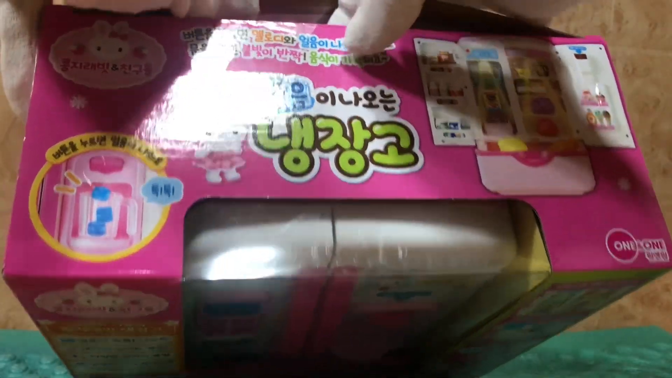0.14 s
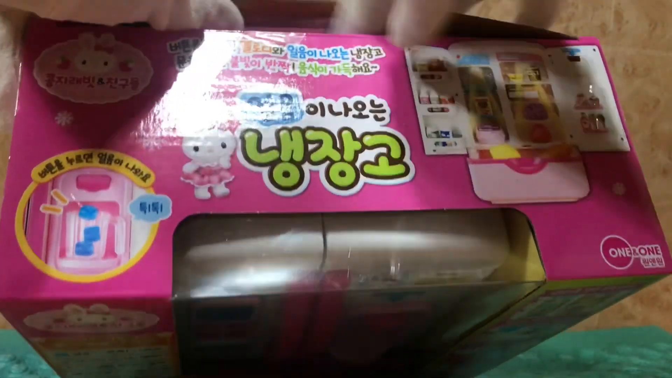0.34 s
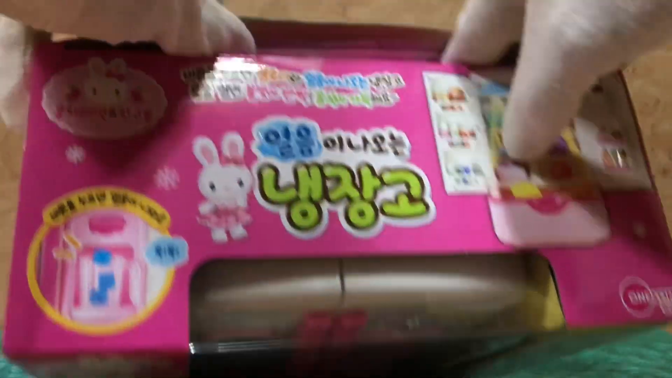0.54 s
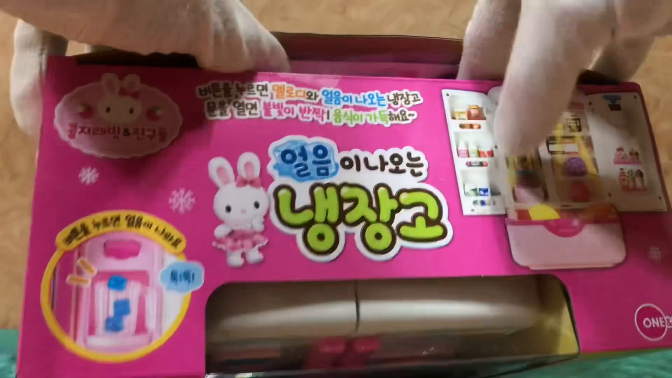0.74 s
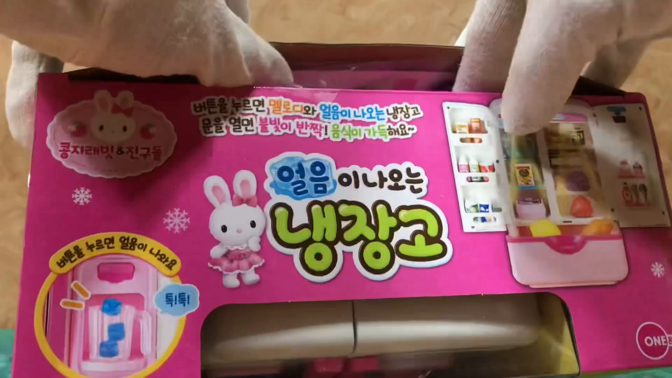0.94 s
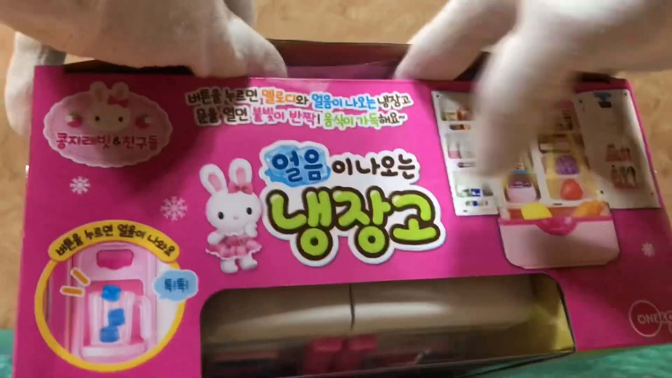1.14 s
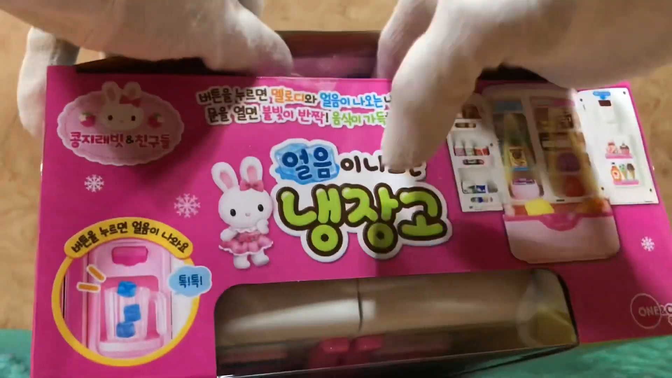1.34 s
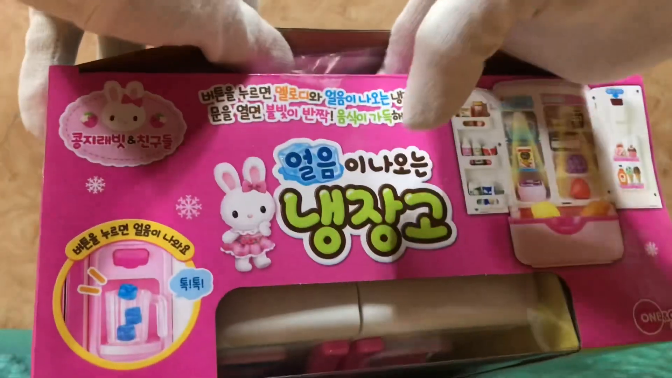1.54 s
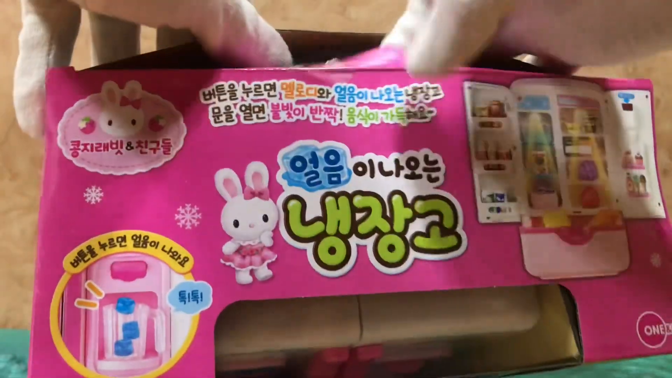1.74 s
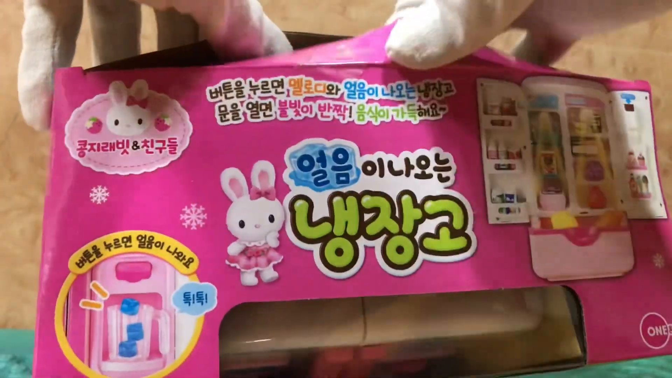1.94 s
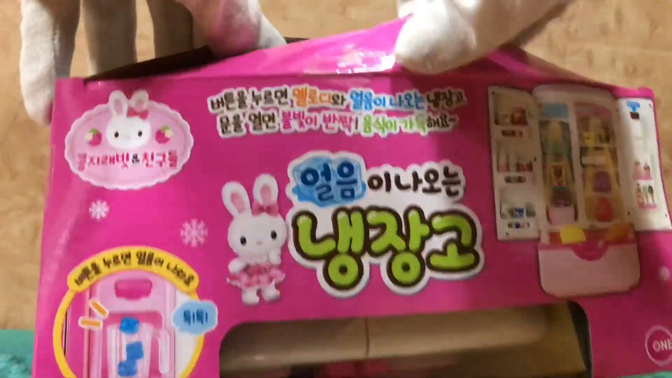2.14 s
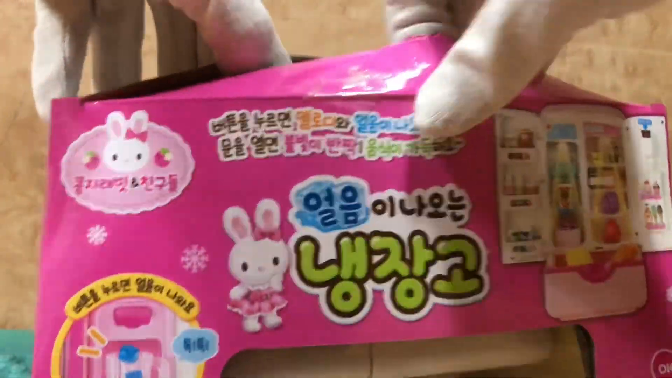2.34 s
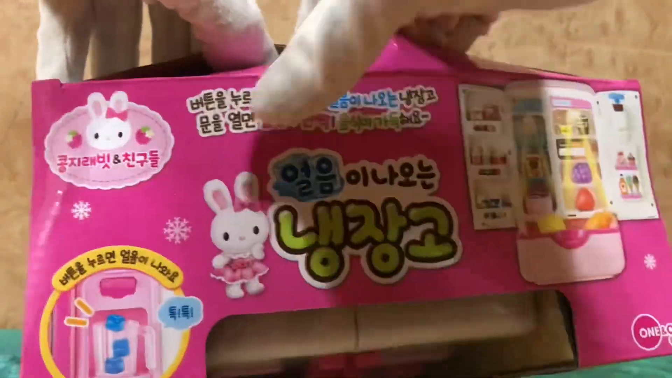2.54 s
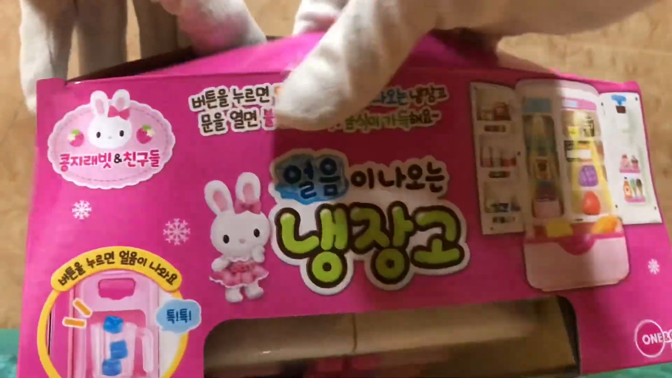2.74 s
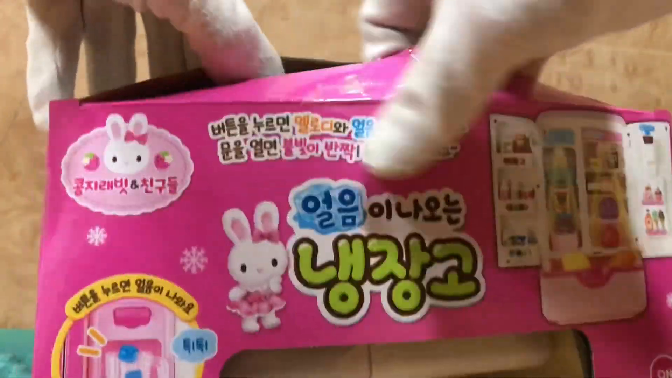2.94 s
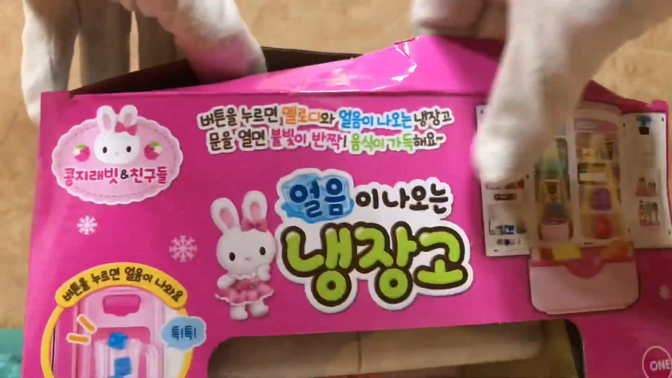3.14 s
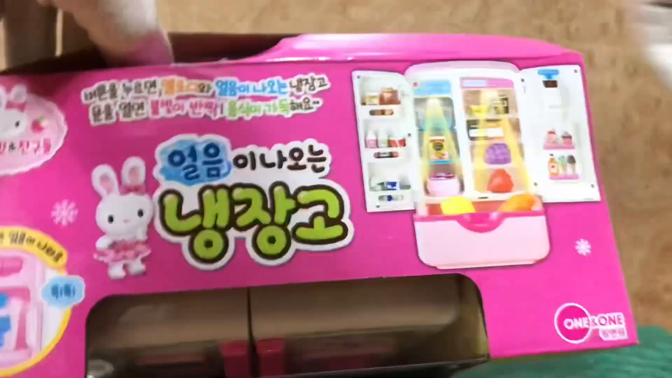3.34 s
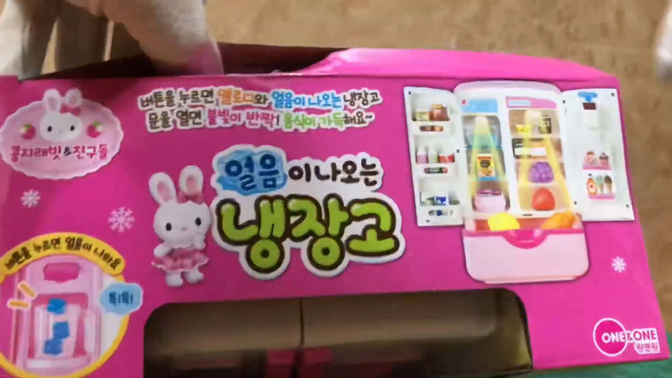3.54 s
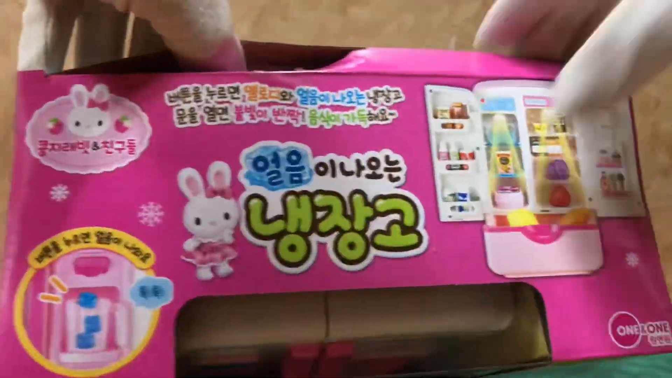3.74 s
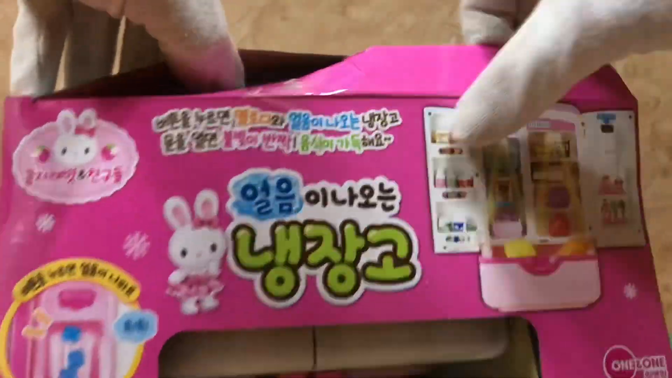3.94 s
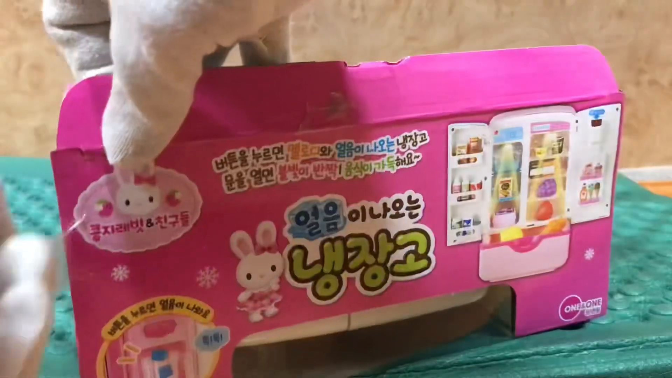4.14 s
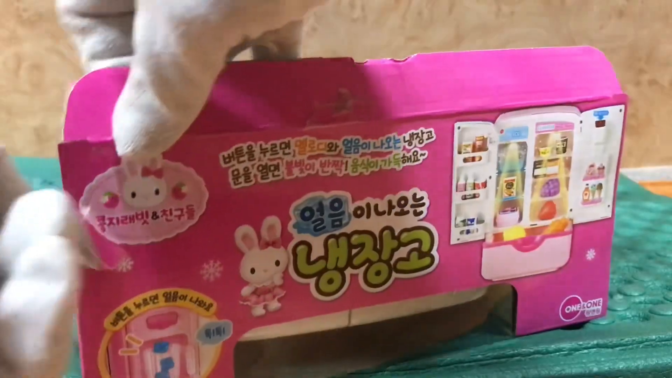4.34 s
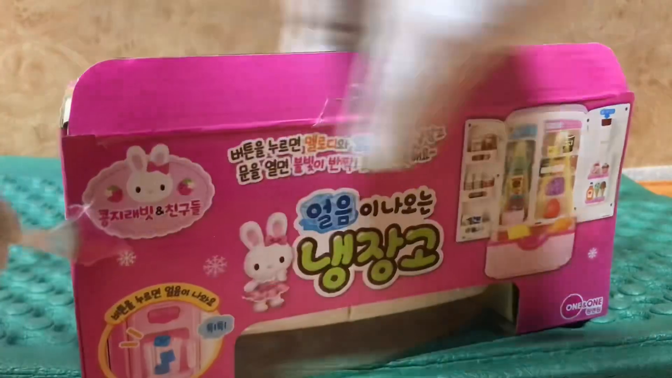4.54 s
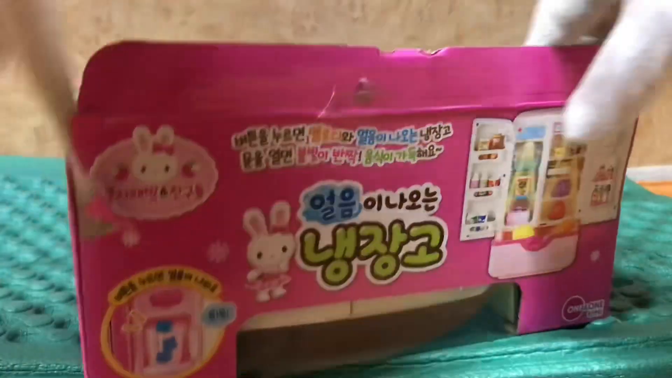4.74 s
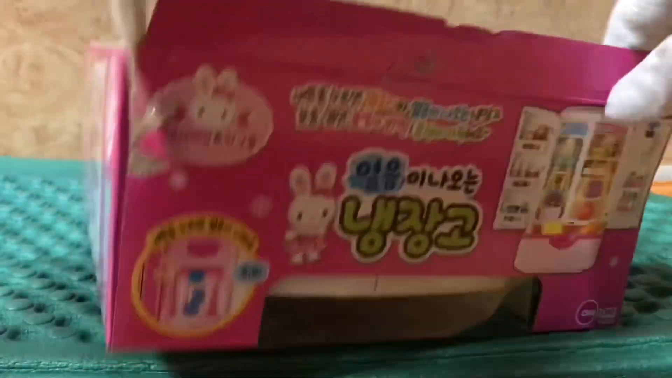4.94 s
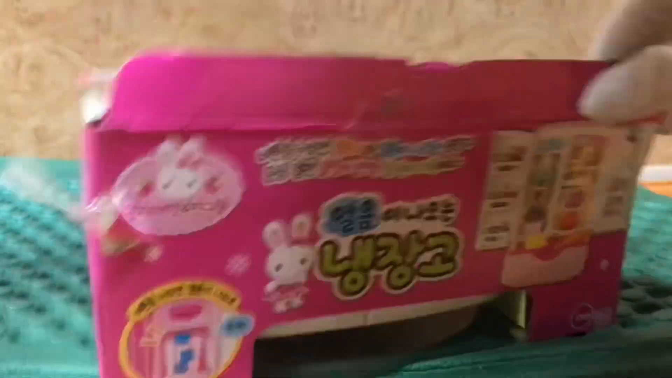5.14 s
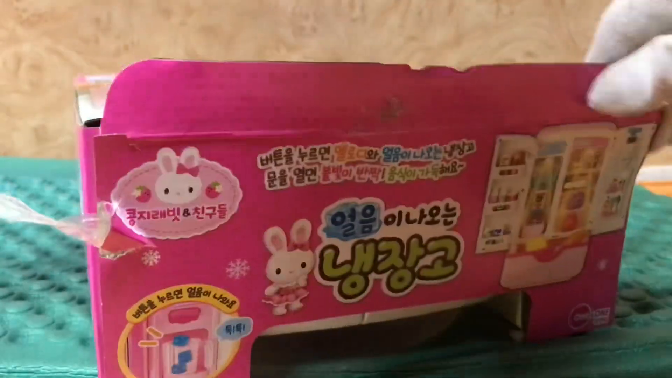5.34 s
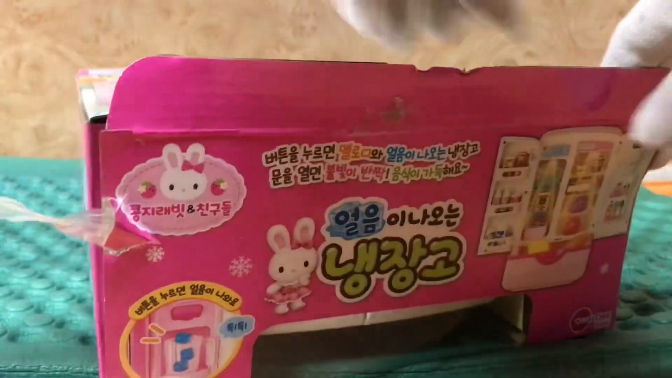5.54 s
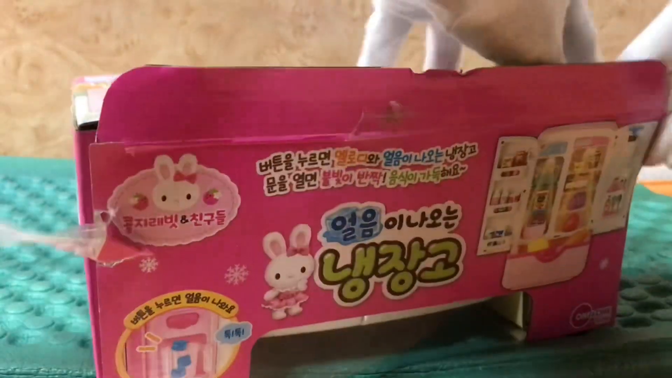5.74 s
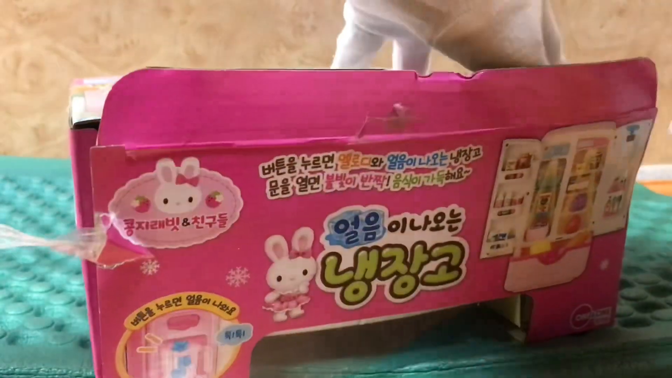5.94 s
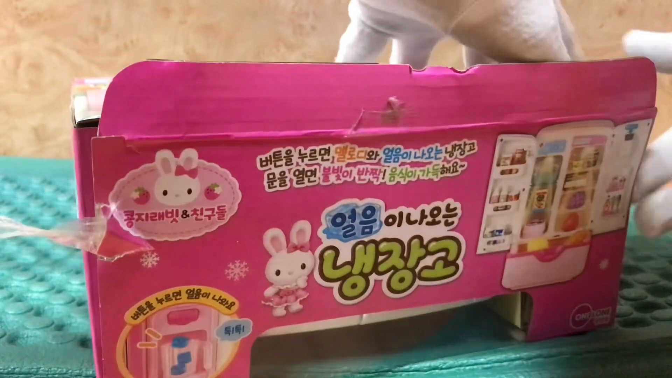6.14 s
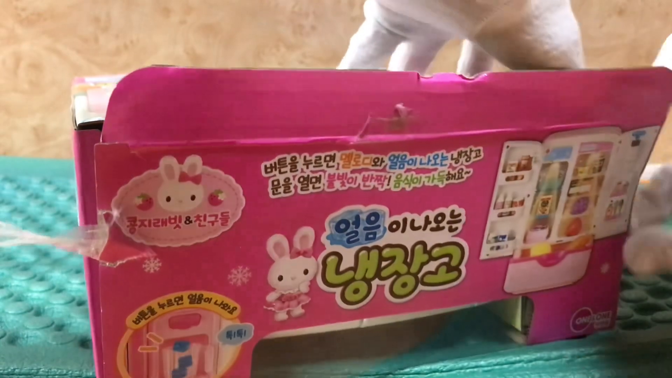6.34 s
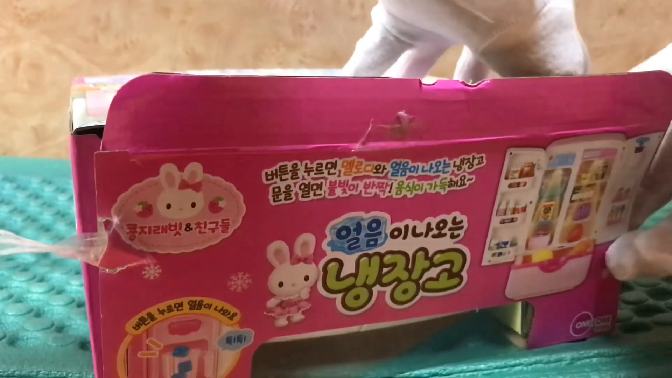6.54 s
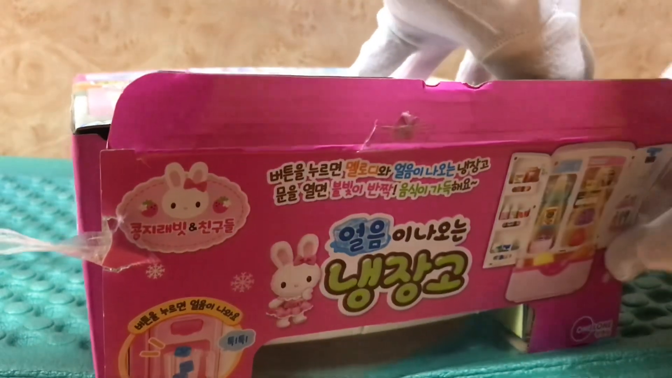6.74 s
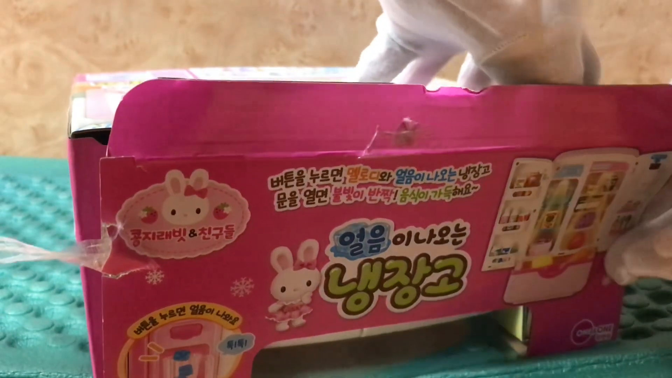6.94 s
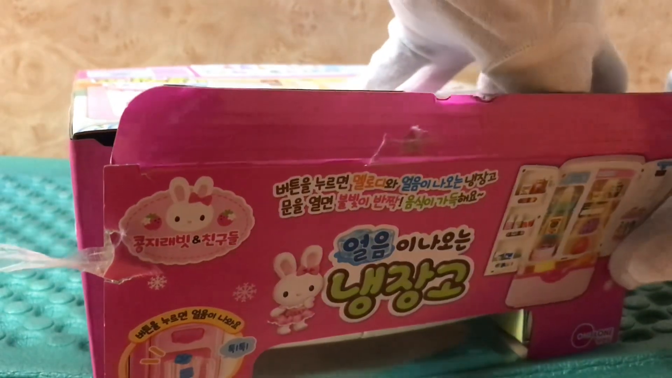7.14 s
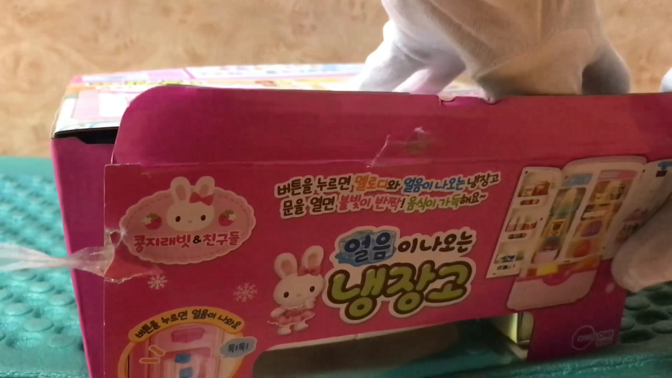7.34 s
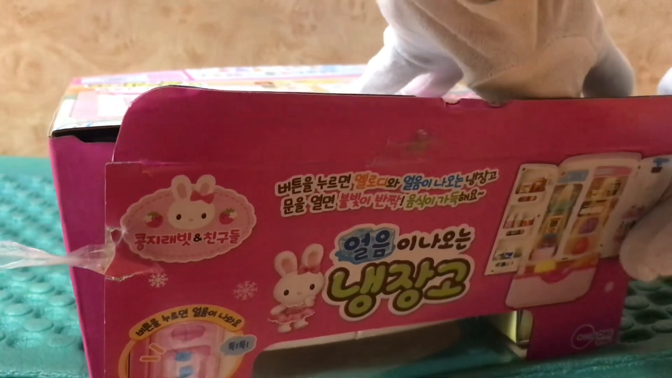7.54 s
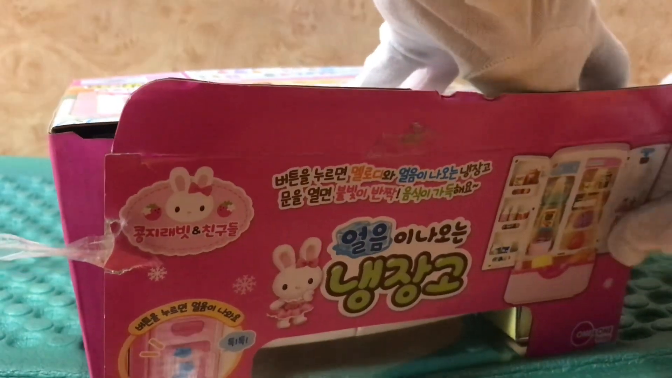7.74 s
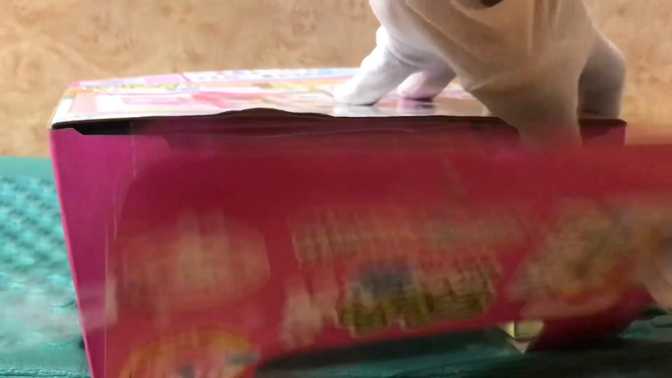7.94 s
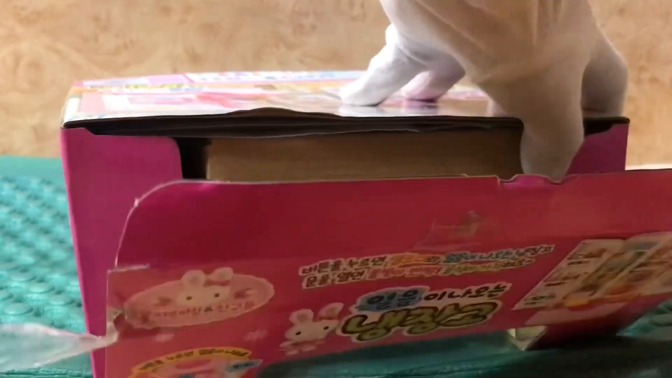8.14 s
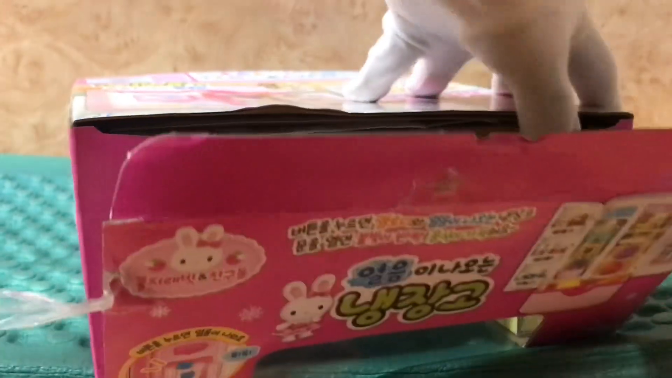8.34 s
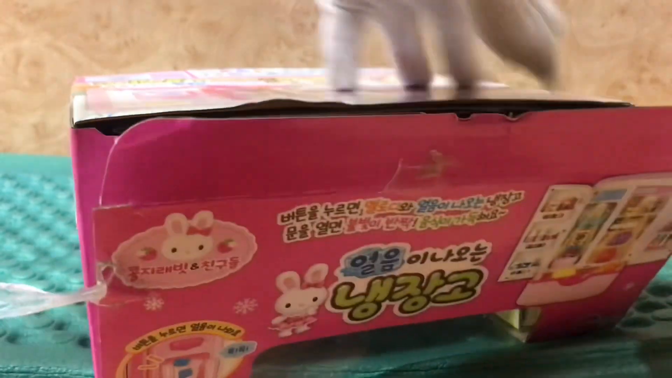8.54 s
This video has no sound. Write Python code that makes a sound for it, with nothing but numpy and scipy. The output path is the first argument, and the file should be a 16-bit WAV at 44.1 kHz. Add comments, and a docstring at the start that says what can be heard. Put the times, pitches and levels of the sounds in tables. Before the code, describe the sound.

Quiet indoor room tone with faint hiss; a cardboard box is handled very close. From 0 to 1.2 s there are only a light snap, faint scrapes and small ticks. Around 1.25-1.6 s dry card clicks and grainy rubs gather into a firm hollow knock at 1.63 s. Creaks and scrapes continue, with a papery snap at 2.24 s and smaller ones to 2.9 s. Two loud, boxy pops land at 3.18 and 3.29 s, then it calms. A tiny near-mute gap at 4.06 s leads straight into bright, rapid tape tearing at 4.15-4.25 s. Softer shuffles follow, with a crack and brief faint glove squeaks near 5.0-5.1 s, and sparse taps and rubs, one crisp tick at 6.36 s. At 7.67-7.92 s sharp, glossy flap cracks and a thump burst out; little clicks at 8.3-8.4 s fade into room tone.

```python
"""A light snap and a faint scrape over quiet room tone: gloved hands pry open a glossy card box close by.
Flaps, creases and tape snap as torn bursts ringing the card; the hollow box thumps as sagging sines.
Fingers and flaps slide in grainy scrapes made of random slips through card modes, with hiss and rumble,
and a fingertip squeaks briefly. A short room tail answers; an edit cut leaves one nearly mute gap."""
import sys
import numpy as np
from scipy import signal
from scipy.io import wavfile
from scipy.ndimage import uniform_filter1d

SR = 44100
rng = np.random.default_rng(int(sys.argv[2]) if len(sys.argv) > 2 else 0)


def level_to_linear(level):
    """Convert decibel levels to linear amplitude factors, elementwise."""
    exponent = np.asarray(level, float) / 20
    return 10 ** exponent


def put_to_file(sound):
    """Save the sound as 16-bit audio at rate SR, in the file named by the first command-line argument."""
    columns = np.atleast_2d(sound).T  # one column per channel
    safe = np.clip(columns, -1, 1)
    whole_steps = np.round(safe * 32767)
    wavfile.write(sys.argv[1], SR, whole_steps.astype(np.int16))


N = 378819

# modes of the card panel, base widths and relative levels: (pitch_hz, width_hz, level_db)
CARD_MODES = [(435, 41, -12.5), (731, 26, -15.5), (1090, 420, 6), (1600, 780, 11), (2255, 870, -5.5),
              (2730, 930, -15), (3400, 660, -16), (4300, 1800, -12.5), (1110, 152, -18), (1590, 92, -19),
              (2272, 74, -24), (4280, 320, -23), (6200, 1800, -12.5)]
# treble spectrum of cracks and fine slips, relative: (frequency_hz, level_db per Hz)
HISS_SPECTRUM = [(1470, -40), (2500, -7), (2930, -8.5), (3350, -1.5), (5050, -3.5), (5770, 0.5),
                 (7150, -3.5), (8840, -2.5), (10500, -6.5), (13000, -2.5), (15400, -3), (16500, -17.5)]
# the hollow box pushed or set down: (start_s, peak_db, pitch_hz, t60_s)
BOX_PUSHES = [(0.276, -44, 64, .1), (0.48, -42, 68.4, 0.095), (1.241, -41.5, 113, 0.07),
              (1.434, -35.5, 324, 0.043), (1.632, -13.5, 124, 0.077), (2.247, -37.5, 65, 0.29),
              (2.252, -31.5, 208, 0.054), (2.313, -33.5, 237, 0.088), (2.409, -34.5, 151, 0.38),
              (2.488, -31, 148, 0.14), (2.602, -29, 198, 0.092), (2.696, -26, 227, 0.076),
              (2.886, -37, 190, 0.13), (3.186, -14, 114, 0.044), (3.295, -13.5, 98.7, 0.062),
              (3.931, -39.5, 76.6, 0.2), (4.16, -28, 236.4, 0.17), (4.177, -29, 297, 0.083),
              (4.194, -23.5, 364, 0.051), (4.216, -25.5, 322, 0.053), (4.23, -20, 374, 0.031),
              (4.537, -37, 102, 0.068), (4.79, -47.5, 61.7, 0.26), (4.831, -46, 58, 0.63),
              (5.005, -26.5, 213, 0.029), (5.017, -22.5, 201, 0.039), (5.043, -33, 149, 0.12),
              (5.149, -27.5, 197, 0.023), (5.171, -37, 56.7, .15), (5.599, -20, 140, 0.089),
              (5.938, -53, 252, 0.085), (6.064, -45, 87.3, 0.082), (6.36, -36, 203.4, 0.043),
              (6.531, -29.5, 116.5, 0.03), (6.743, -32, 198, 0.032), (7.173, -42.5, 195, 0.055),
              (7.296, -43.5, 96.3, 0.16), (7.666, -28, 238, 0.037), (7.761, -24, 243, 0.12),
              (7.835, -16, 118, 0.05), (7.914, -30, 212, 0.11), (8.048, -42.5, 74.6, 0.12),
              (8.24, -40.5, 82, 0.25), (8.339, -43, 84, 0.05)]
# an edit cut, nearly mute for 16 ms: (start_s, end_s, level_db)
EDIT_CUT = (4.058, 4.074, -23)


def evened(x):
    """Scales to rms 1."""
    return x / np.sqrt(np.mean(x ** 2) + 1e-20)


def read(points, hz):
    """Reads a table of values against frequency on a log axis."""
    f, value = np.transpose(points)
    return np.interp(np.log(hz + 1), np.log(f + 1), value)


def add(mix, start_s, sound):
    """Mixes a sound in at start_s seconds."""
    part = mix[max(round(start_s * SR), 0):][:len(sound)]
    part += sound[:len(part)]


def colour(points, size=4096):
    """Causal (minimum-phase) impulse response with the given spectrum, floored at -80 dB."""
    level_db = read(points, abs(np.fft.fftfreq(size, 1 / SR)))
    log_gain = np.log(level_to_linear(np.maximum(level_db, -80)))
    response = np.fft.ifft(np.exp(np.conj(signal.hilbert(log_gain)))).real
    return response[:size // 2]


def ring(hz, width_hz, size=1500):
    """One dying mode: the wider its resonance, the faster it fades."""
    t = np.arange(size) / SR
    return np.exp(-np.pi * width_hz * t) * np.sin(2 * np.pi * hz * t)


def grains(per_s, spread_db, smooth):
    """Stick-slip: random slips of uneven size over a smooth rub."""
    size = level_to_linear(spread_db * np.minimum(rng.exponential(1, N), 4))
    slipping = rng.random(N) < per_s / SR
    return evened(size * slipping * rng.standard_normal(N)) + smooth * rng.standard_normal(N)


def strokes(t):
    """Sums the strokes by power: scrape dB, hiss dB and favoured pitch; glossier, stiffer card favours higher modes."""
    # fingers and flaps over the card; gloss_db sets hiss relative to scrape:
    # (hardest_s, swell_s, release_s, scrape_db, gloss_db)
    stroke_list = [(.0, 0.023, 0.35, -61, -10), (.367, 0.28, 0.23, -60, 0), (0.838, 0.25, 0.056, -53.5, -8),
                   (1.043, 0.035, 0.069, -51, -6), (1.252, 0.25, 0.12, -67.5, 7.5),
                   (1.34, 0.19, 0.1, -53, -17), (1.471, 0.019, 0.14, -40, -10),
                   (1.517, 0.1, 0.022, -37, -15), (1.633, 0.033, 0.044, -34.5, -14.5),
                   (1.759, 0.14, 0.058, -47, -9.5), (2.02, 0.37, 0.12, -51, -9),
                   (2.118, 0.023, 0.025, -51.5, -12), (2.238, 0.046, 0.041, -35, -9),
                   (2.318, 0.028, .045, -45, -7.5), (2.41, 0.037, 0.08, -34.5, -11.5),
                   (2.501, 0.043, 0.026, -40, -10), (2.589, 0.14, 0.055, -49, -10.5),
                   (2.696, 0.062, 0.058, -40, -8.5), (2.848, 0.015, 0.077, -43, -17),
                   (2.89, 0.052, 0.16, -40, -4), (3.14, 0.4, 0.05, -44, -4),
                   (3.194, 0.039, 0.14, -32.5, -6), (3.301, 0.066, 0.1, -34, -29),
                   (3.705, 0.057, 0.17, -48, -3.5), (4.057, 0.14, 0.016, -41, -2.5),
                   (4.11, 0.38, 0.27, -48.5, -11), (4.185, 0.026, 0.022, -34, -2.5),
                   (4.25, 0.09, 0.28, -51, -0.5), (4.563, 0.14, 0.3, -46.5, -0.5),
                   (4.97, 0.25, 0.17, -59, 6.5), (5.005, 0.03, 0.19, -48, -3.5),
                   (5.101, 0.028, 0.021, -60, 13), (5.297, 0.22, 0.2, -53.5, -2),
                   (5.605, 0.033, 0.06, -55, -0.5), (5.793, 0.27, 0.076, -52, 1),
                   (5.951, .05, 0.073, -68.5, -5.5), (6.102, 0.045, 0.073, -56, 0.5),
                   (6.319, 0.054, 0.061, -57.5, 2), (6.371, 0.024, 0.28, -53, -21),
                   (6.505, 0.23, 0.076, -49.5, 1), (6.735, 0.18, .12, -53, -2), (7.2, 1, 0.39, -73, 6.5),
                   (7.301, 0.041, 0.28, -62.5, 0), (7.641, 0.4, 0.051, -60, -1),
                   (7.675, 0.057, 0.53, -52.5, -1), (7.775, 0.013, 0.16, -28.5, -1),
                   (8.305, 0.034, 0.046, -52, -4.5), (8.357, 0.021, 0.12, -41, -14),
                   (8.44, 0.31, 0.11, -60, 2)]
    # pitch favoured on matt card, lower once the flap is loose, high while tape is pulled: (time_s, pitch_hz)
    matt_pitch = [(0, 1440), (1.63, 1530), (1.68, 1190), (3.3, 1170), (4.06, 1080), (4.07, 3400),
                  (4.15, 3400), (4.16, 1100), (8.32, 1150), (8.36, 1700), (8.59, 1600)]
    span_db = 20  # lost over one swell or release time
    matt_db, octaves_per_db, stiffest_hz = -3.5, 0.9, 3800
    card, hiss, octave = np.full((3, len(t)), 1e-10)
    for s, swell, release, scrape_db, gloss_db in stroke_list:
        away = np.where(t < s, (s - t) / max(swell, .005), (t - s) / max(release, .005))
        power = level_to_linear(scrape_db - span_db * away) ** 2
        card = card + power
        hiss = hiss + power * level_to_linear(gloss_db) ** 2
        octave = octave + power * octaves_per_db * max(gloss_db - matt_db, 0)
    base_hz = np.interp(t, *np.transpose(matt_pitch))
    favoured_hz = np.minimum(base_hz * 2 ** (octave / card), stiffest_hz)
    return 10 * np.log10(card), 10 * np.log10(hiss), favoured_hz


def shaking(t, scrape_db):
    """Rumble level in dB: the grip, the strokes and the shaking each thump leaves behind."""
    # the box shifting in the hands: (time_s, rumble_db)
    grip = [(0.0, -99), (0.26, -46.5), (1.08, -84), (1.7, -73), (2.1, -49.5), (2.49, -61), (2.72, -69),
            (3.23, -62), (3.52, -107), (4.62, -53), (5.12, -42.5), (5.36, -55), (6.17, -53), (6.56, -48),
            (6.96, -58.5), (7.85, -44), (8.06, -56), (8.59, -49.5)]
    stroke_offset_db, stroke_share = -9.5, 0.75  # rumble dB = offset + share x scrape dB
    thump_offset_db, shake_t60_s = -5.5, 0.13  # relative to the thump's peak
    power = level_to_linear(np.interp(t, *np.transpose(grip))) ** 2
    power = power + level_to_linear(stroke_offset_db + stroke_share * scrape_db) ** 2
    for s, peak_db, _, _ in BOX_PUSHES:
        left_db = peak_db + thump_offset_db - 60 * abs(t - s) / shake_t60_s
        power = power + (t > s) * level_to_linear(left_db) ** 2
    return 10 * np.log10(power)


def slide():
    """Slips ring the card modes near the rubbed place; finer slips hiss; the held box rumbles."""
    # low spectrum of the held box, relative: (frequency_hz, level_db per Hz)
    rumble_spectrum = [(18, -26.5), (30, -20.5), (64, 6.5), (119, -5.5), (337, -14.5), (428, -26.5),
                       (473, -22), (600, -20), (780, -62), (1320, -120)]
    creases_per_s, crease_share = 620, 0.35  # coarse crackle among the slips
    octave_db, waver_db = 0, 4
    third_octaves, third_db = 1.42, 1.5  # a third group of modes, higher still
    t, slow = np.arange(N) / SR, np.arange(0, N + 64, 64) / SR
    slow_card_db, slow_hiss_db, favoured_hz = strokes(slow)
    card_db = np.interp(t, slow, slow_card_db)
    hiss_db = np.interp(t, slow, slow_hiss_db)
    rumble_db = np.interp(t, slow, shaking(slow, slow_card_db))

    # pressure jerks
    uneven = evened(uniform_filter1d(uniform_filter1d(rng.standard_normal(N), 500), 500))
    slips = grains(2500, 2.14, 0.85) + crease_share * grains(creases_per_s, 2.7, 0)
    slips = np.diff(slips, prepend=0)
    slips = signal.lfilter(*signal.butter(2, 4500, fs=SR), slips)  # a gloved fingertip is soft

    # fingers damp each mode by turns
    waver = rng.standard_normal((len(CARD_MODES), len(slow)))
    waver = evened(uniform_filter1d(uniform_filter1d(waver, 20), 20))
    shares, rings = [], []
    for (hz, width_hz, level_db), damped in zip(CARD_MODES, waver):
        octaves_off = np.log2(hz / favoured_hz)
        main = np.where(octaves_off < 0, favoured_hz / 130 * octaves_off, -14.0 * octaves_off)
        octave_up = octave_db - 16.0 * abs(octaves_off - 1)
        third = third_db - 22.0 * abs(octaves_off - third_octaves)
        near_db = np.max([main, octave_up, third], 0)
        shares.append(np.interp(t, slow, level_to_linear(0.76 * level_db + near_db + waver_db * damped)))
        # each mode acts twice, into the panel and out to the air: clear valleys between modes
        mode = ring(hz, 2.3 * width_hz)
        rings.append(evened(signal.oaconvolve(slips, np.convolve(mode, mode))[:N]))
    shares, rings = np.array(shares), np.array(rings)
    card = (shares * rings).sum(0) / np.sqrt((shares ** 2).sum(0))

    hiss = evened(signal.oaconvolve(grains(2500, 1.2, 1.0), colour(HISS_SPECTRUM))[:N])
    rumble = evened(signal.oaconvolve(grains(300, 2.5, 0.69), colour(rumble_spectrum))[:N])
    deep = signal.lfilter(*signal.butter(2, 80, "low", fs=SR), rumble)
    faces = signal.lfilter(*signal.butter(2, 80, "high", fs=SR), rumble)
    # harder handling shakes the box faces more than the table under it
    held = level_to_linear(rumble_db) * faces + level_to_linear(0.37 * rumble_db - 32.5) * deep
    return level_to_linear(card_db + 1.8 * uneven) * card + level_to_linear(hiss_db + 1.7 * uneven) * hiss + held


def air():
    """Room tone and microphone noise: steady noise of a fixed spectrum."""
    # relative spectrum: (frequency_hz, level_db per Hz)
    air_spectrum = [(18, -19.5), (30, 3), (230, 0.5), (340, -10), (600, -10), (1490, -9), (1700, -12.5),
                    (3500, -22.5), (6000, -30.5), (8760, -28.5), (10500, -29), (14800, -31.5),
                    (16500, -32.5)]
    noise = signal.oaconvolve(rng.standard_normal(N), colour(air_spectrum))[:N]
    return level_to_linear(-63) * evened(noise)  # rms dB


def snaps():
    """Each release is a short run of tearing fibres that rings the card and cracks in the treble."""
    # flaps, creases and tape letting go; pitch of the flexed panel, crack ahead of a 5.5 dB lift:
    # (start_s, knock_peak_db, pitch_hz, crack_peak_db)
    releases = [(0.01, -37.5, 1430, -51), (0.081, -51, 1560, -51.5), (0.445, -40, 1600, -52),
                (0.455, -47, 724, -50), (0.51, -51, 934, -54), (0.77, -29.5, 1700, -41),
                (0.829, -38.5, 1600, -66), (0.928, -38.5, 3600, -56), (1.067, -44, 5240, -44.5),
                (1.248, -27, 1600, -35), (1.318, -34, 1670, -43), (1.427, -29.5, 1600, -43),
                (1.436, -32, 1600, -55), (1.468, -27.5, 1660, -36), (1.475, -22, 4300, -42),
                (1.482, -32.5, 514, -55), (1.51, -26, 1590, -55), (1.556, -34, 1590, -64),
                (1.612, -30, 1600, -56), (1.626, -15.5, 790, -29), (1.63, -15, 1600, -35),
                (1.729, -35, 3180, -49), (1.735, -37, 3000, -55), (1.749, -29, 3000, -39),
                (1.763, -30.5, 2950, -47), (1.77, -33, 3020, -56), (1.965, -42, 1110, -63),
                (2.108, -41, 1080, -58), (2.24, -18.5, 1200, -32), (2.264, -44, 1170, -40),
                (2.322, -37, 1030, -58), (2.406, -50, 964, -34), (2.466, -30.5, 945, -67),
                (2.492, -33, 704, -51), (2.504, -30, 1590, -41), (2.582, -36, 910, -42),
                (2.672, -29.5, 1620, -45), (2.693, -32, 1090, -52), (2.726, -35, 1130, -43),
                (2.781, -32.5, 1190, -43), (3.182, -2, 1600, -25), (3.251, -27, 1290, -24.5),
                (3.282, -47, 2510, -31), (3.293, 0, 1130, -29), (3.698, -37, 1150, -44.5),
                (3.735, -31.5, 1170, -56), (3.927, -36, 1590, -65), (3.961, -34, 3200, -40.5),
                (4.088, -60, 4000, -44), (4.156, -16, 3100, -36), (4.161, -11, 1800, -24),
                (4.177, -36, 4600, -16.5), (4.184, -21, 3800, -17.5), (4.189, -29, 3730, -18.5),
                (4.193, -19, 1480, -23), (4.216, -10, 4600, -12), (4.23, -18.5, 1110, -14.5),
                (4.381, -29.5, 3600, -40.5), (4.659, -43, 4390, -35.5), (4.664, -32, 3180, -39),
                (4.916, -61, 4350, -36.5), (4.929, -55, 4300, -38), (4.977, -48.5, 1660, -32),
                (5.005, -28.5, 1800, -20.5), (5.148, -38.5, 810, -51), (5.599, -33.5, 734, -50),
                (5.8, -31.5, 3440, -56), (5.951, -35.5, 780, -47), (6.169, -35.5, 2275, -45),
                (6.362, -24.5, 1270, -18), (6.515, -27, 1395, -51), (7.293, -25.5, 4070, -32),
                (7.404, -49.5, 2240, -47), (7.668, -15, 2330, -30), (7.702, -37, 5800, -55),
                (7.715, -33.5, 6200, -58), (7.728, -31, 6300, -60), (7.758, -13, 2500, -10.5),
                (7.777, -8.5, 3500, -18), (7.793, -18, 3400, -36), (7.813, -20.5, 1910, -37),
                (7.834, -12, 3800, -16), (7.921, -17, 2470, -23.5), (8.057, -32, 4940, -34),
                (8.096, -48, 3520, -44), (8.234, -46.5, 840, -63.5), (8.298, -29.5, 1920, -48),
                (8.341, -28.5, 850, -42), (8.355, -15, 1720, -47), (8.356, -21, 2970, -51),
                (8.385, -27, 910, -55)]
    tear_t60_s = 0.022
    first_break = 4.64  # extra jolt of the first fibres to part, against the noise of the rest
    overtone = 2.03  # times the panel's pitch
    out, t = np.zeros(N), np.arange(800) / SR
    bright = colour(HISS_SPECTRUM)[:256]
    tears = rng.standard_normal((len(releases), 3, 800))
    for (s, knock_db, hz, crack_db), (jolts, cracks, fibres) in zip(releases, tears):
        lumps = level_to_linear(1.68 * evened(uniform_filter1d(fibres, 40)))  # fibre by fibre
        fade = level_to_linear(-60 * t / tear_t60_s) * (1 - np.exp(-t / 0.00042)) * lumps
        loss_hz = 80 + hz ** 2 / 30000  # higher panels die faster
        # the flexed panel rings at its own pitch, and modes near it join in
        panel = 2.1 * ring(hz, loss_hz) + level_to_linear(-3.0) * ring(overtone * hz, 2.3 * loss_hz)
        for mode_hz, width_hz, level_db in CARD_MODES:
            near_db = level_db - 3.3 * abs(np.log2(mode_hz / hz))
            panel = panel + level_to_linear(near_db) * ring(mode_hz, 1.4 * width_hz)
        radiated = signal.lfilter([1, -.85], 1, panel)  # a small panel radiates little bass
        jolt = jolts * fade
        jolt[15] += first_break
        push = signal.lfilter(*signal.butter(3, 1.5 * hz + 900, fs=SR), jolt)  # soft card
        knock = signal.oaconvolve(push, radiated)
        crack = signal.oaconvolve(cracks * fade ** 1.92, bright)
        add(out, s, level_to_linear(knock_db) * knock / abs(knock).max())
        add(out, s, level_to_linear(crack_db + 5.5) * crack / abs(crack).max())
    return out


def thumps():
    """The air in the box and its wide faces ring for a few cycles after a soft push."""
    rise_cycles = 0.28  # deeper pushes are softer
    sag, sag_s = .25, .03  # share of pitch lost as the box settles, and its time constant
    out, t = np.zeros(N), np.arange(SR // 4) / SR
    for (s, peak_db, hz, t60_s), (turn, face) in zip(BOX_PUSHES, rng.random((len(BOX_PUSHES), 2))):
        fade = level_to_linear(-60 * t / max(t60_s, .01)) * (1 - np.exp(-t * hz / rise_cycles))
        cycles = np.cumsum(hz * (1 - sag * (1 - np.exp(-t / sag_s)))) / SR
        side = 0.34 * np.sin(2 * np.pi * ((1.9 + 0.65 * face) * cycles + turn))
        thump = fade * (np.sin(2 * np.pi * cycles) + side)
        add(out, s, level_to_linear(peak_db) * thump / abs(thump).max())
    return out


def squeaks():
    """A fingertip catches on the glossy face and chatters near one pitch for a moment."""
    # glove on gloss, level ahead of the chatter: (start_s, level_db, pitch_hz, length_s, glide_hz)
    catches = [(4.973, -46, 1655, 0.01, 1.5), (5.087, -47.5, 2360, 0.019, -89),
               (5.106, -54.5, 2150, 0.045, 511.5)]
    out = np.zeros(N)
    for s, level_db, hz, length, glide_hz in catches:
        t = np.arange(0, length, 1 / SR)
        chatter = level_to_linear(5.6 * evened(uniform_filter1d(rng.standard_normal(len(t)), 90)))
        swell = np.sin(np.pi * t / length)
        tone = np.sin(2 * np.pi * t * (hz + glide_hz * t / length / 2))
        add(out, s, level_to_linear(level_db) * chatter * swell * tone)
    return out


def room(x):
    """Room tail: sparse taps of random sign, each band dying at its own speed."""
    # decay time by band: (frequency_hz, t60_s)
    decay = [(100, 0.48), (400, 0.22), (1200, 0.44), (2500, 0.63), (6000, 0.57), (14000, 0.067)]
    taps = np.zeros(SR)
    at = np.arange(200, SR - 20, 20)
    taps[at + rng.integers(0, 20, len(at))] = rng.choice([-1., 1.], len(at))
    hz, t, bands = signal.stft(taps, SR, nperseg=256)
    t60_s = np.maximum(read(decay, hz), .05)[:, None]
    tail = signal.istft(bands * level_to_linear(-60 * t / t60_s), SR, nperseg=256)[1]
    tail = tail / np.linalg.norm(tail)
    parts = np.split(x, [round(EDIT_CUT[1] * SR)])  # the tail from before the edit cut stops dead
    return np.concatenate([signal.fftconvolve(p, tail)[:len(p)] for p in parts])


def scene():
    """Blows and slides, their room tail, and the still air."""
    blows = snaps() + thumps()
    rub = slide() + squeaks()
    tail = room(level_to_linear(-17.0) * blows + level_to_linear(-15.5) * rub)
    return (blows + rub + tail + air())[None]


def roll_off(x):
    """The treble ends steeply here."""
    return signal.sosfilt(signal.butter(12, 17000, fs=SR, output="sos"), x)


def record(dry):
    """The nearly mute gap of the edit cut, then the small microphone's thin bass."""
    start_s, end_s, gap_db = EDIT_CUT
    t = np.arange(N) / SR
    level_db = uniform_filter1d(np.where((t > start_s) & (t < end_s), gap_db, 0.), 40)
    highpass = signal.butter(2, 42, "highpass", fs=SR, output="sos")
    mix = signal.sosfilt(highpass, dry * level_to_linear(level_db))
    return roll_off(mix)


dry = scene()
out = record(dry)
put_to_file(out)
```